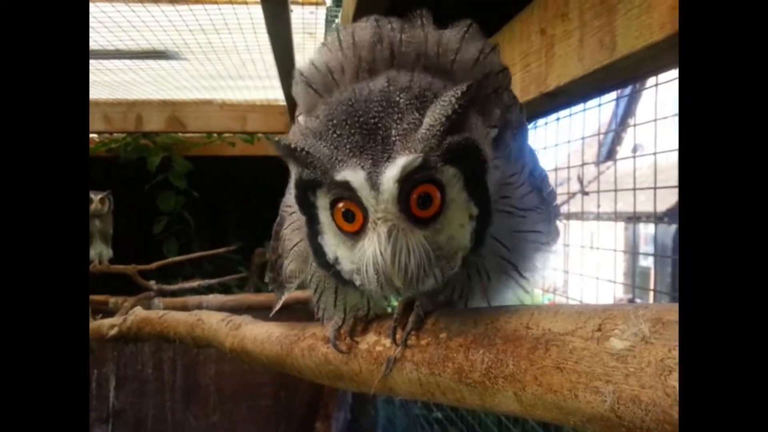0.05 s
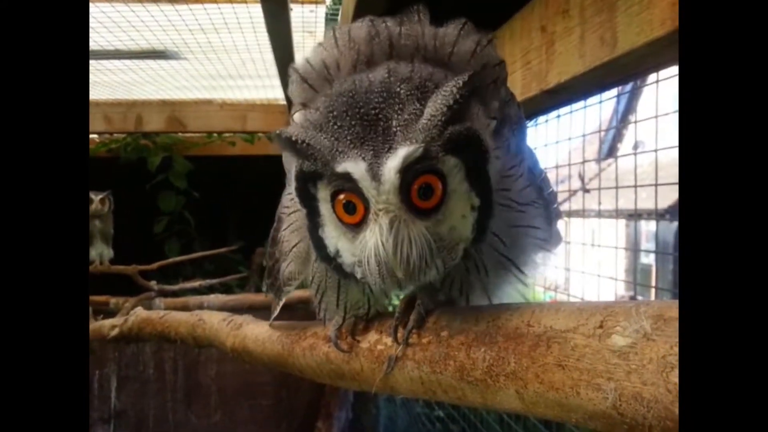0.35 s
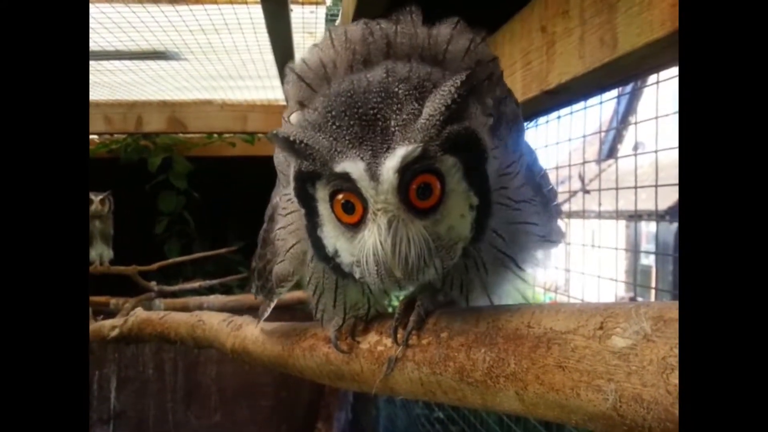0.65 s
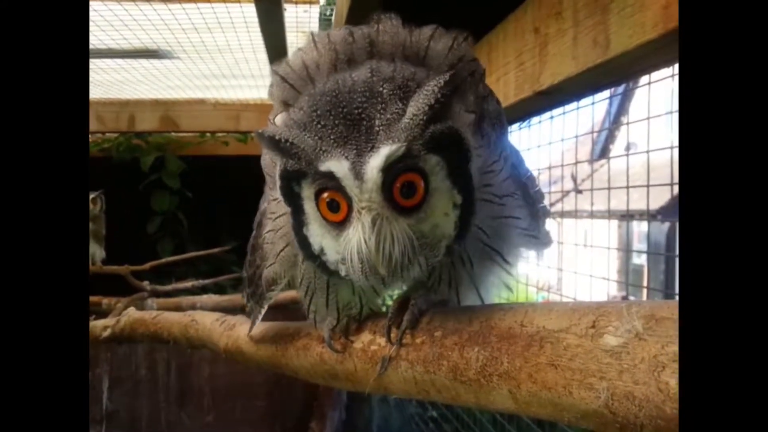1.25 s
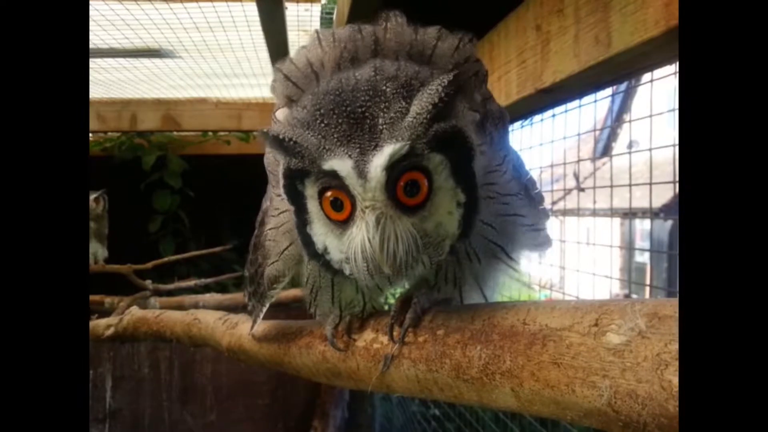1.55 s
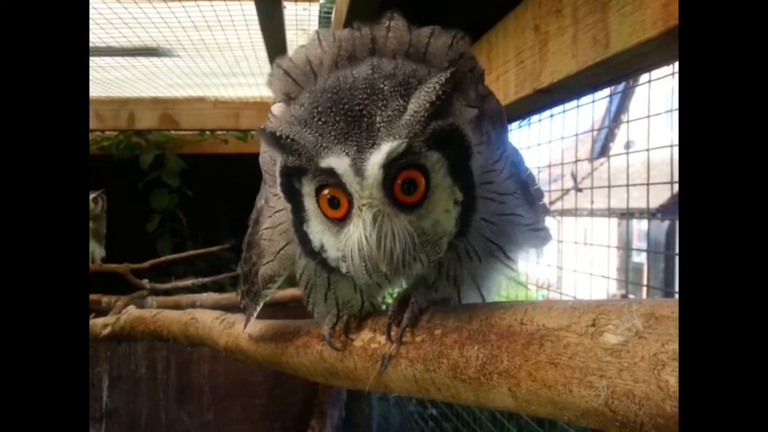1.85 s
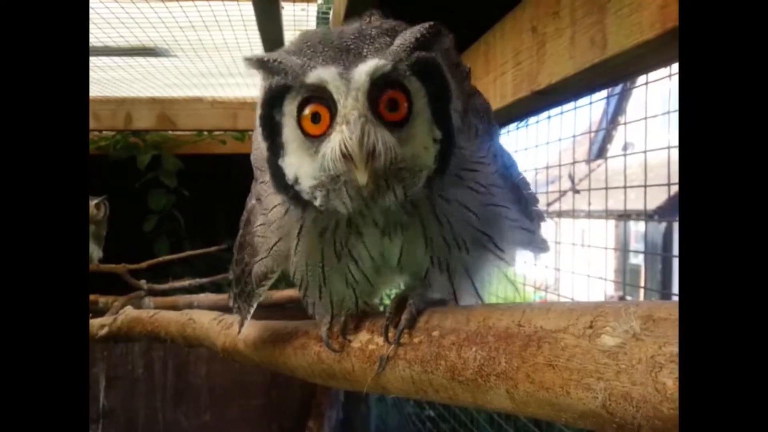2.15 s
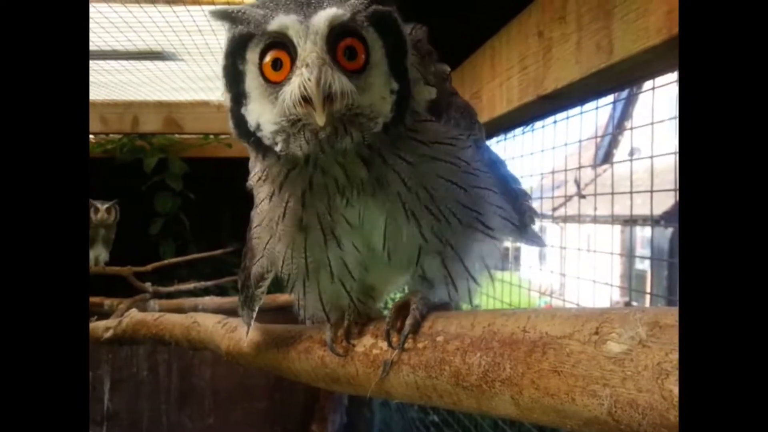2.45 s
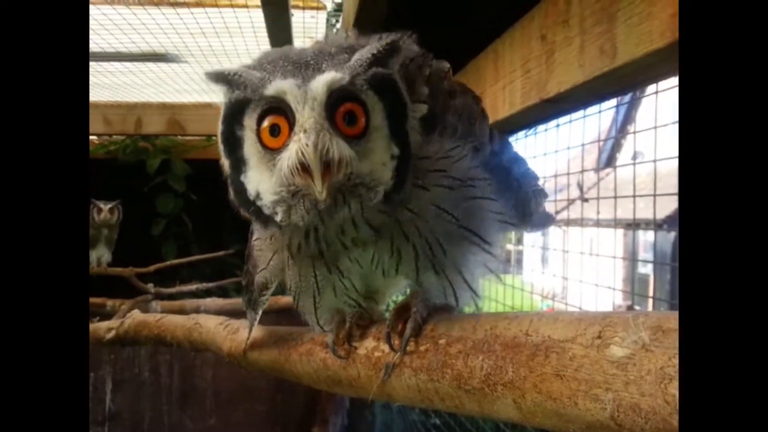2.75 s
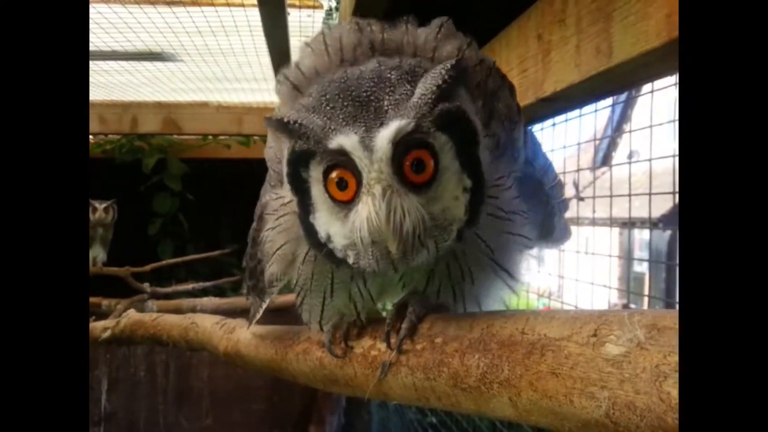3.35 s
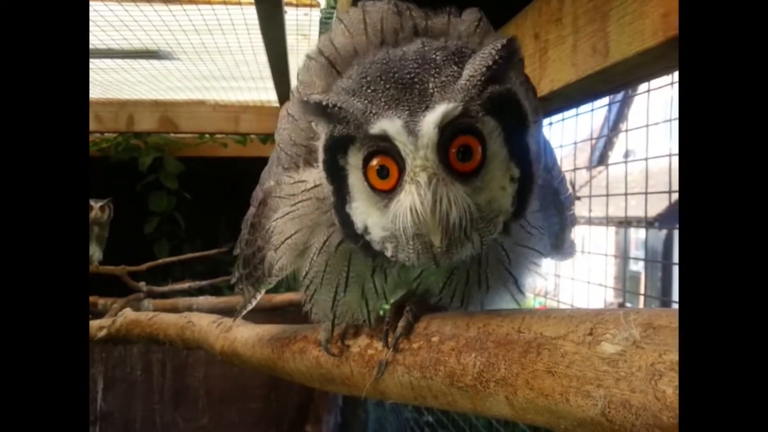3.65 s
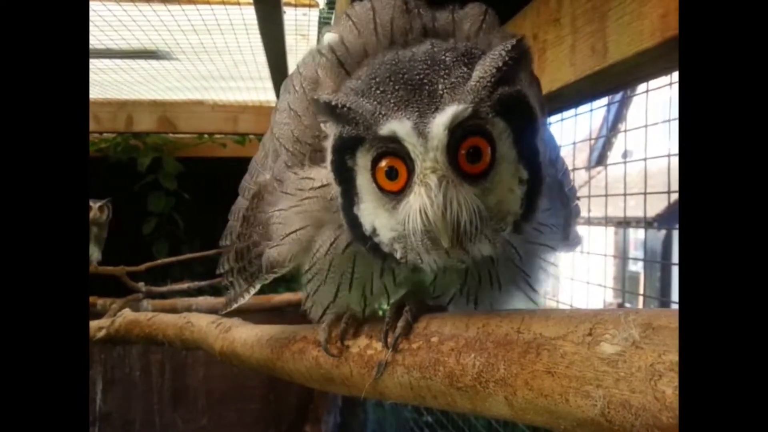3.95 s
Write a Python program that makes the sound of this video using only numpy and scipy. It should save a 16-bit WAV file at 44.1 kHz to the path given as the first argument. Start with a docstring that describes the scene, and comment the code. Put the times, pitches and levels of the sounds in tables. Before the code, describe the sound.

Wind rumbles and thumps on the microphone from the start, gusting unevenly between left and right with a thin airy rush. At about 0.2 seconds a small owl, close and slightly right, snaps its bill once with a dry crack. Around 2.6 to 2.9 seconds it gives one short, soft hiss. The gusts then die down to faint outdoor background, stirring slightly again near 4 seconds.

```python
"""Wind thumps and rumbles on a stereo microphone in an outdoor aviary, buffeting each port on its own.
Close by, a little to the right, a small owl threatens: its bill claps shut in one dry snap, and
later it pushes one short hiss through the open bill. After the hiss the gusts die down.
A thin airy rush and a few brief swishes come with the wind, over a faint outdoor background."""
import sys
import numpy as np
from scipy import signal
from scipy.fft import rfft, irfft
from scipy.io import wavfile
from scipy.ndimage import uniform_filter1d

SR = 44100
rng = np.random.default_rng(int(sys.argv[2]) if len(sys.argv) > 2 else 0)


def to_wav(s):
    """Save 16-bit WAV."""
    ch = np.atleast_2d(s).T  # columns
    pcm = np.round(np.clip(ch, -1, 1) * 32767)  # PCM
    wavfile.write(sys.argv[1], SR, pcm.astype(np.int16))


N = 176400
LEFT_LAG_S = .0003  # the owl's sound reaches the left port this much later
LEFT_CUT_HZ, RIGHT_CUT_HZ = 104, 63.2  # each port thins the wind's bass below this


def undb(db):
    """Decibels to gain."""
    return 10 ** (np.asarray(db) / 20)


def times():
    """Seconds at every sample."""
    return np.arange(N) / SR


def curve(rows):
    """Join (s, value) rows by straight lines."""
    return np.interp(times(), *np.array(rows, float).T)


def pan(db):
    """Constant-power gains that put the left channel db above the right."""
    gains = undb(np.array([[db], [-db]]) / 2)
    return gains / np.sqrt(np.mean(gains ** 2))


def per_bin(points):
    """Join (Hz, dB) points on a log-frequency axis."""
    hz, db = np.array(points, float).T
    return np.interp(np.log(np.arange(N // 2 + 1) * SR / N + 1), np.log(hz), db)


def coloured(x, db):
    """Filter a sound by a gain in dB for every bin, then bring it to unit power."""
    x = irfft(rfft(x) * undb(db), N)
    return x / x.std()


def noise(db):
    """Fresh unit-power noise, coloured bin by bin."""
    return coloured(rng.standard_normal(N), db)


def stereo_noise(points):
    """Unrelated left and right noise of one colour."""
    return np.array([noise(per_bin(points)) for _ in range(2)])


def flutter(per_s):
    """Glide between random values, per_s of them a second, with a spread of 1."""
    hold = int(SR / per_s)
    steps = rng.standard_normal(N)[np.arange(N) // hold]
    glide = uniform_filter1d(steps, hold)
    return glide / glide.std()


def click(points):
    """The shortest causal click of a given colour, peak 1."""
    cepstrum = irfft(np.log(undb(per_bin(points))), N)
    cepstrum[1:N // 2] *= 2
    cepstrum[N // 2 + 1:] = 0
    x = irfft(np.exp(rfft(cepstrum)), N)
    return x / np.abs(x).max()


def outdoors():
    """Faint open-air noise around the aviary swells slowly and recedes."""
    # Each row: frequency in Hz, relative level in dB.
    colour = [(25, -19.5), (60, -8), (300, -13.5), (500, 1.5), (980, -1.5), (1340, -8), (1900, -18.5),
              (2900, -30), (4000, -21.5), (5600, -37), (11000, -37), (14000, -54)]
    # Each row: frequency in Hz, tilt towards the left in dB.
    balance = [(300, -22), (600, 7), (1000, -1.5), (1700, 10), (2300, 4.5), (4000, 14), (6000, -6.5),
               (14000, -1.5)]
    # Each row: time in seconds, level in dB.
    level = [(0, -64.5), (2.0, -61.5), (3.0, -64.5), (3.5, -68), (4.0, -65)]
    bed = np.array([noise(per_bin(colour) + side * per_bin(balance) / 2) for side in (1, -1)])
    return bed * undb(curve(level))


def narrow_rush():
    """A soft, narrow band of noise comes and goes, left of the microphone."""
    # Each row: time in seconds, level in dB.
    level = [(0, -70.5), (1.1, -73.5), (1.5, -69.5), (1.8, -66.5), (2.2, -69), (2.7, -68.5), (3.0, -77.5),
             (4.0, -80.5)]
    centre_hz, step_octaves = 1860, .24
    band = [(centre_hz * 2 ** (k * step_octaves), -4 * k * k) for k in np.arange(-4, 5)]
    return stereo_noise(band) * undb(curve(level)) * pan(db=11.5)


def air():
    """A thin rush that rises and drops with the gusts at both ports."""
    # Each row: frequency in Hz, relative level in dB.
    colour = [(1000, -2), (2000, -1), (2900, -2.5), (3900, -2.5), (5200, 0), (7000, -5), (9000, -9),
              (12000, -14), (14500, -23)]
    # Each row: time in seconds, level in dB.
    level = [(0, -66.5), (.035, -67), (.1, -67.5), (.17, -65), (.22, -69), (.27, -68), (.43, -66),
             (.5, -70.5), (.585, -70.5), (.61, -64.5), (.74, -66.5), (.8, -64.5), (.88, -69), (.92, -65.5),
             (.96, -71), (1.01, -68.5), (1.13, -66), (1.28, -66), (1.38, -68.5), (1.44, -68), (1.53, -69.5),
             (1.69, -72), (1.8, -68), (1.9, -73.5), (1.99, -68.5), (2.15, -71), (2.24, -67), (2.6, -66.5),
             (2.95, -76.5), (3.45, -78), (3.8, -76), (4.0, -71.5)]
    return stereo_noise(colour) * undb(curve(level)) * pan(db=-2)


def swishes():
    """Faint brief swishes of wind passing the microphone."""
    # Each row: centre in seconds, half-width in seconds, peak level in dB.
    swells = [(0.618, 0.015, -71), (1.579, .014, -61.5), (1.76, 0.013, -64), (1.826, .015, -67),
              (3.145, .012, -67.5), (3.885, 0.068, -64.5)]
    # Each row: frequency in Hz, relative level in dB.
    colour = [(900, 8), (2100, 5), (3000, -7), (5500, -5), (9000, -7.5), (14000, -15)]
    envelope = sum(undb(db) * np.exp(-((times() - at) / width) ** 2) for at, width, db in swells)
    return stereo_noise(colour) * envelope * pan(db=-2.5)


def add_eddy(out, at_s, size, corner_hz):
    """Add the pressure bump of one passing eddy; its spectrum dies away above the corner."""
    reach = SR / corner_hz
    i = np.arange(max(int(at_s * SR - reach), 0), min(int(at_s * SR + reach), N))
    out[i] += size / np.cosh(np.pi ** 2 * corner_hz * (i / SR - at_s))


def port(x, cut_hz):
    """A microphone port passes neither the deepest bass nor the treble of the turbulence."""
    for hz, kind in ((36, "high"), (cut_hz, "high"), (1930, "low")):
        x = signal.sosfilt(signal.butter(2, hz, kind, fs=SR, output="sos"), x)
    return x


def eddies(gust, cut_hz):
    """Eddies crowd past one port in quick puffs; stronger wind makes them louder, shorter, brighter."""
    eddies_per_s, scatter_db, corner_scatter = 700, 4, .16
    reference_hz, reference_db, db_per_octave = 237, -28.5, 18
    gust_db = curve(gust)
    puff_db = 2.5 * flutter(per_s=60)
    pressure = np.zeros(N)
    draws = rng.standard_normal((int(eddies_per_s * N / SR), 4))
    for k, (shift, strength, brightness, sign) in enumerate(draws):
        i = int(np.clip((k + shift) / eddies_per_s * SR, 0, N - 1))
        octaves = (gust_db[i] + puff_db[i] - reference_db) / db_per_octave
        corner_hz = reference_hz * 2 ** octaves * np.exp(corner_scatter * brightness)
        size = np.sign(sign) * undb(scatter_db * strength + puff_db[i])
        add_eddy(pressure, i / SR, size, corner_hz)
    rumble = port(pressure, cut_hz)
    power = uniform_filter1d(rumble ** 2, size=3500)  # divided out, so the gust sets the slow level
    return rumble / np.sqrt(power + 1e-12) * undb(gust_db + .5)


def gusts():
    """Wind rumbles right on the microphone, rising and falling at each port on its own."""
    # Each row, for either port: time in seconds, wind strength in dB.
    left = [(0.0, -35), (0.18, -28.5), (0.22, -33.5), (0.42, -27.5), (0.5, -36.5), (0.58, -36.5),
            (0.64, -30), (0.9, -31.5), (0.98, -43.5), (1.04, -30.5), (1.5, -33), (1.54, -37), (1.58, -33.5),
            (1.64, -44.5), (1.66, -38), (1.82, -33.5), (1.86, -39), (2.06, -31.5), (2.14, -36), (2.22, -30),
            (2.58, -27), (2.62, -35), (2.74, -39), (2.8, -54), (2.88, -40), (2.96, -50.5), (3.8, -51.5),
            (3.87, -43), (4.0, -38.5)]
    right = [(0.0, -36.5), (0.08, -33), (0.16, -29.5), (0.2, -40.5), (0.26, -28.5), (0.3, -45.5),
             (0.36, -38), (0.46, -44.5), (0.6, -33), (0.68, -28.5), (0.94, -38.5), (1.14, -26.5),
             (1.26, -29.5), (1.32, -31.5), (1.36, -36), (1.88, -39.5), (1.98, -37), (2.1, -42.5),
             (2.22, -33), (2.4, -28), (2.44, -39.5), (2.52, -31), (2.56, -28.5), (2.72, -35.5), (2.76, -46),
             (2.8, -38), (3.02, -51), (3.159, -46.5), (3.3, -57), (3.53, -67.5), (3.6, -49), (3.78, -51),
             (4.0, -41)]
    return np.array([eddies(left, LEFT_CUT_HZ), eddies(right, RIGHT_CUT_HZ)])


def buffets():
    """Now and then a hard eddy thumps one port, amid a flurry of weaker ones."""
    # Each row: time in seconds, strength in dB, corner in Hz, half the flurry's length in seconds,
    # side (-1 left, 1 right).
    thumps = [(0.021, -26, 352, 0.0052, -1), (.099, -24, 347, 0.0033, -1), (.263, -24, 352, 0.0039, -1),
              (.299, -22.5, 367, 0.0038, -1), (0.317, -27, 464, 0.0046, -1), (.374, -20.5, 580, 0.0088, -1),
              (0.388, -28, 478, 0.0044, -1), (0.414, -23, 507, 0.0048, -1), (.616, -21.5, 390, 0.0083, -1),
              (.661, -19, 394, 0.0039, -1), (0.699, -19, 308, 0.0066, 1), (.711, -16, 530, 0.0046, -1),
              (.762, -16.5, 306, 0.0035, 1), (.765, -18, 434, 0.0055, -1), (0.798, -20, 490, 0.0077, -1),
              (.851, -16.5, 470, 0.0011, -1), (.864, -22, 378, 0.0015, 1), (.915, -22.5, 474, 0.00095, -1),
              (1.047, -17, 312, 0.0044, 1), (1.088, -25, 330, 0.0056, 1), (1.106, -11, 438, 0.0007, 1),
              (1.126, -14, 325, 0.0071, 1), (1.134, -23, 330, 0.0022, 1), (1.152, -22, 350, 0.0032, 1),
              (1.174, -25, 300, 0.0023, 1), (1.205, -19, 300, 0.002, 1), (1.213, -19, 326, 0.0015, 1),
              (1.249, -25, 265, 0.0025, 1), (1.234, -18.5, 270, 0.0019, 1), (1.289, -27, 277, 0.0043, 1),
              (1.315, -16, 302, 0.0035, 1), (1.394, -24, 370, 0.0016, -1), (1.441, -23, 310, 0.0029, -1),
              (1.454, -25.5, 360, 0.0046, -1), (1.507, -27, 333, 0.0019, -1), (1.588, -20, 333, 0.0057, -1),
              (1.756, -26, 324, 0.0029, -1), (1.81, -28.5, 400, 0.0015, -1), (1.93, -25, 170, 0.0026, 1),
              (1.975, -27, 353, 0.0032, -1), (2.053, -25, 322, 0.0044, -1),
              (2.115, -25.5, 340, 0.00273, -1), (2.287, -22.5, 383, 0.0066, -1),
              (2.34, -17, 500, 0.0041, -1), (2.394, -19, 500, 0.0028, -1), (2.412, -17.5, 690, 0.0029, -1),
              (2.445, -21, 450, 0.0029, -1), (2.471, -21, 420, 0.0032, -1), (2.489, -21.5, 395, 0.0031, -1),
              (2.517, -20, 380, 0.0057, 1), (2.599, -20, 295, 0.0026, 1), (2.626, -12.5, 340, 0.0057, 1),
              (2.676, -21.5, 354, 0.0057, -1), (2.733, -27.5, 225, 0.0049, -1),
              (2.793, -24.5, 209, 0.0051, 1), (2.832, -26.5, 208, 0.003, 1),
              (3.142, -35.5, 170, 0.0043, -1), (3.179, -35, 150, 0.0061, 1), (3.492, -41, 110, 0.0089, -1),
              (3.890, -27, 200, 0.0015, 1), (3.925, -35, 260, 0.0018, 1)]
    flurry_per_s, flurry_db = 1000, -2.5
    left, right = np.zeros((2, N))
    for at, db, corner_hz, half_s, side in thumps:
        pressure = right if side > 0 else left
        size = undb(db + 2.5)
        add_eddy(pressure, at, -size, corner_hz)
        flurry_start = at - .598 * half_s
        for k in range(int(2 * half_s * flurry_per_s)):
            shift, share = rng.uniform(-.85, 1, 2)
            eddy_s = flurry_start + (k + shift) / flurry_per_s
            add_eddy(pressure, eddy_s, size * undb(flurry_db) * share, corner_hz)
    return np.array([port(left, LEFT_CUT_HZ), port(right, RIGHT_CUT_HZ)])


def hiss():
    """Close by, the owl pushes air through its open bill; the left port hears it later and duller."""
    # Each row, for either port: frequency in Hz, relative level in dB.
    left_colour = [(600, 6), (1500, 9), (2300, -1), (3100, -8), (3950, 4), (4700, -2), (5700, -8),
                   (7400, -10), (8300, -3), (9400, -11), (10500, -17), (11700, -6), (14500, -18)]
    right_colour = [(600, -4), (1750, -.5), (2350, -6), (2950, -9), (3650, -5.5), (4200, 1.5), (5500, -.5),
                    (7200, -.5), (8500, -4), (9800, -5.5), (10900, -3), (13700, -7), (14500, -12)]
    start_s, attack_s, hold_s, release_s = 2.575, .17, .047, .14
    t = times() - start_s
    before_peak = np.maximum(1 - t / attack_s, 0)
    after_peak = np.maximum((t - attack_s - hold_s) / release_s, 0)
    swell_db = -29 * (before_peak + after_peak) ** 1.61  # the power rounds the shoulders
    jet = rng.standard_normal(N)
    left = coloured(np.roll(jet, int(LEFT_LAG_S * SR)), per_bin(left_colour)) * undb(-54.5)
    right = coloured(jet, per_bin(right_colour)) * undb(-49.5)
    return np.array([left, right]) * undb(swell_db + .5 * flutter(per_s=45))


def bill_snap():
    """The bill's halves clap shut: a dry crack, a very short ring, a faint echo off the enclosure."""
    # Each row, in all three: frequency in Hz, relative level in dB.
    crack_colour = [(1000, -34), (2000, -20), (2400, -13), (3200, -5.5), (3800, -6), (4300, -11), (4850, 0),
                    (6500, -.5), (8700, -5), (10000, -13), (11400, -4), (14500, -12)]
    bill_resonances = [(1000, -26), (2000, -10), (3000, -12), (3550, -20), (4250, -4), (4900, -18),
                       (5500, -7), (6300, -14), (7400, -17), (7950, -8), (8750, -21), (9300, -5), (9900, 1),
                       (11000, -10), (11900, -13), (13200, -2), (14500, -9)]
    echo_colour = [(1200, -18), (2600, -10), (4200, -4), (5700, 0), (8000, -5), (10000, -8), (11500, -13),
                   (14500, -4)]
    snap_s, ring_delay_s, ring_t60_s, echo_t60_s = .1721, .0006, .006, .08
    # On the left, away from the owl, the crack is later, weaker and coloured by the bill's resonances.
    left = np.roll(click(bill_resonances), int((snap_s + LEFT_LAG_S) * SR)) * undb(-16.5)
    right = np.roll(click(crack_colour), int(snap_s * SR)) * undb(-6.5)
    crack = np.array([left, right])
    t = times() - (snap_s + ring_delay_s)
    fade = lambda t60_s: (t >= 0) * undb(-60 * np.maximum(t, 0) / t60_s)
    ring = noise(per_bin(bill_resonances)) * fade(ring_t60_s) * undb(-37) * pan(db=-2)
    echo = stereo_noise(echo_colour) * fade(echo_t60_s) * undb(-48) * pan(db=11)
    return ring + echo - crack


def scene():
    """The aviary's background, the wind on the microphone and the owl close by."""
    background = outdoors() + narrow_rush()
    wind = swishes() + air() + gusts() + buffets()
    return background + wind + hiss() + bill_snap()


def record(dry):
    """The recorder cuts the top steeply."""
    top_hz = 14500
    return signal.sosfilt(signal.ellip(8, .2, 70, top_hz, fs=SR, output="sos"), dry)


dry = scene()
out = record(dry)
to_wav(out)
```